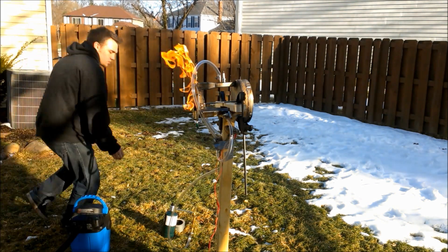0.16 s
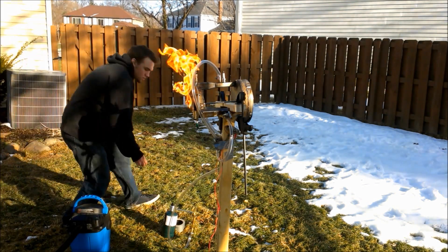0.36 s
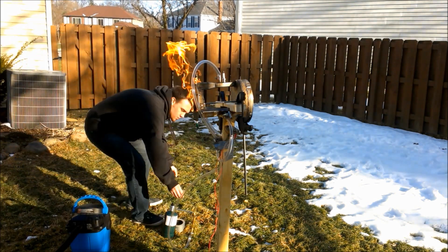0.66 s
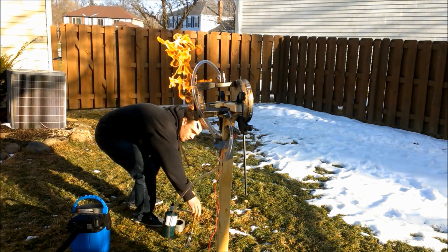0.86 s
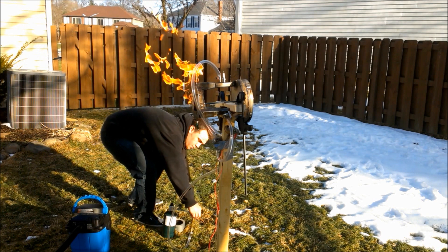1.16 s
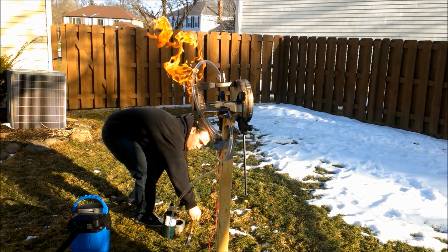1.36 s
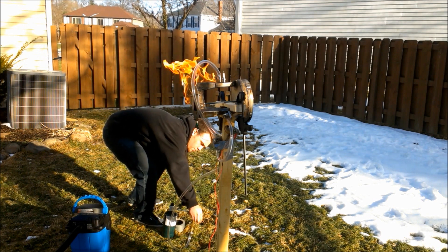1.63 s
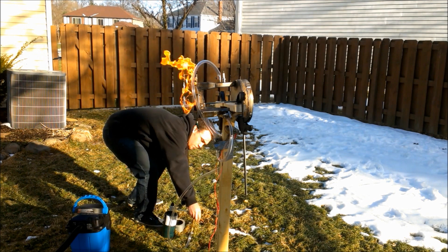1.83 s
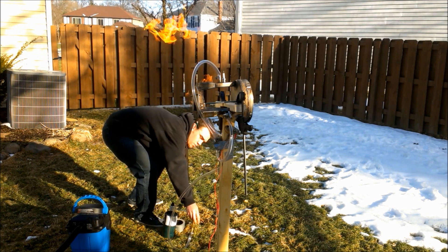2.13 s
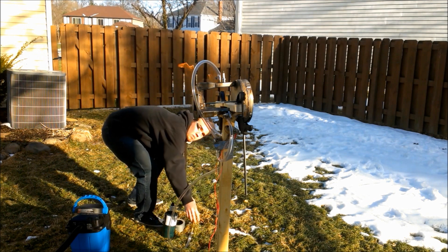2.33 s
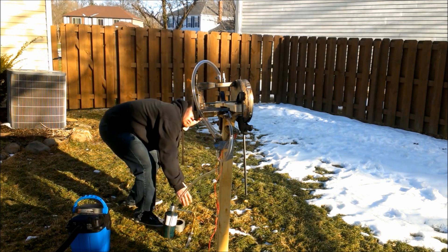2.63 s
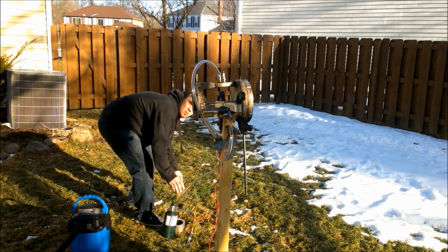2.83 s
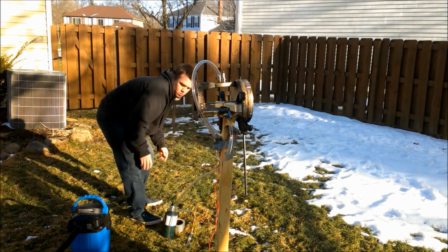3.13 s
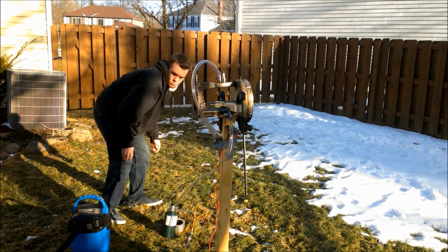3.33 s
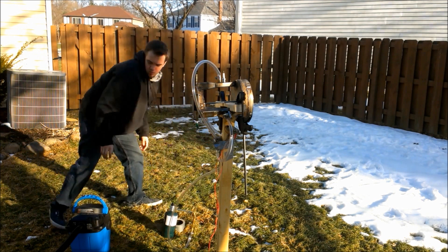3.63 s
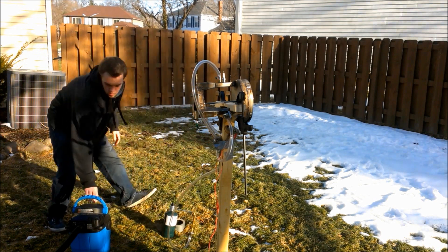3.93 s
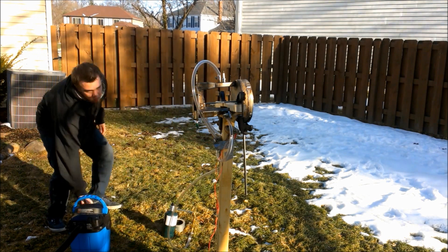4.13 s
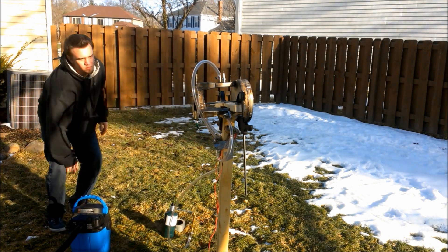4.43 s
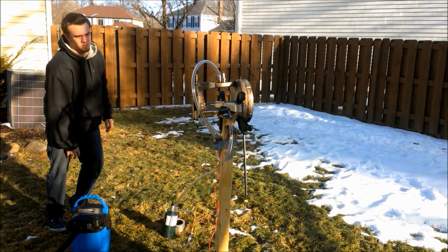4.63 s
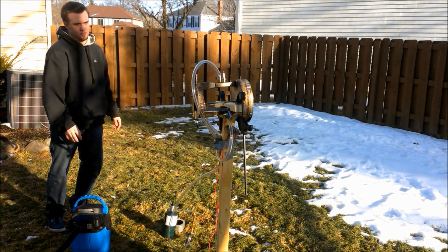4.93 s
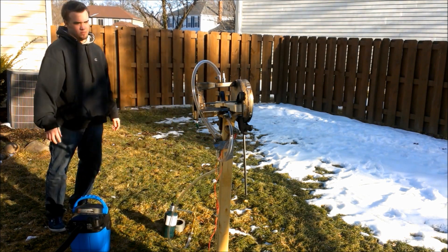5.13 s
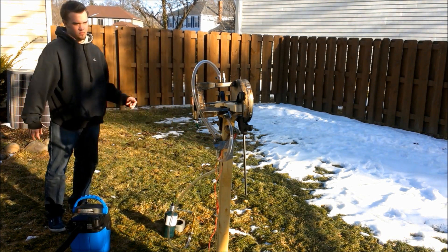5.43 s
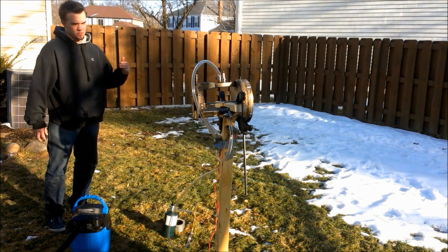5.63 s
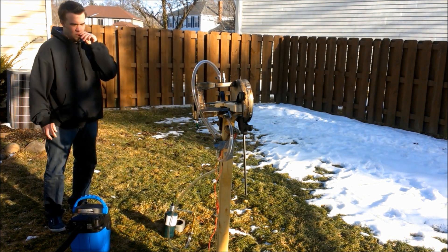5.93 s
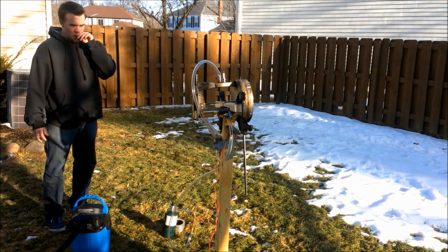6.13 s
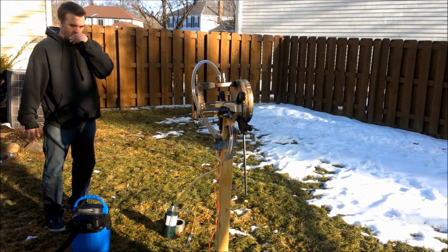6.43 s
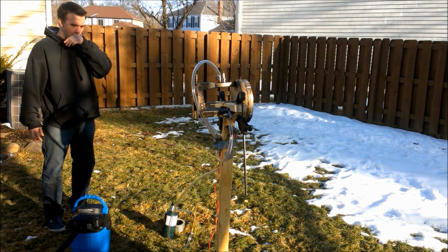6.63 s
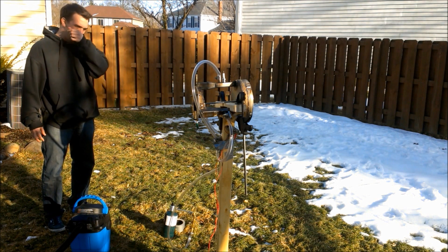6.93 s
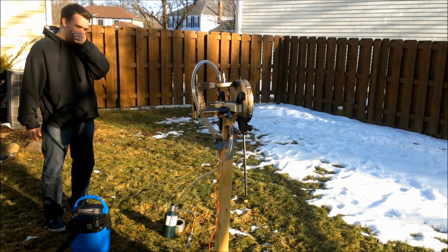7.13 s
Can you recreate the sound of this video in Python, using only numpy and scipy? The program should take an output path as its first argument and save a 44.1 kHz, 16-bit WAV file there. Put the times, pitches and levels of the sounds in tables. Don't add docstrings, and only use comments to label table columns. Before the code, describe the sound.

Outdoors in a fenced yard, a small electric blower runs steadily from 0 to 4 seconds: a shaft hum around 530 Hz, a piercing blade whine near 6.4 kHz and many thin overtones inside a dense bright hiss, the treble leaning left. Beneath it a burner rumbles in lumpy low flutters, with gusts and lulls. A soft double knock lands at about 1.85 and the loudest low knock at 2.84; the hiss dips slightly afterward. At 4.0 a switch makes a sharp tick with a short rustle. The air rush fades fast over the next second or so while all the tones slide continuously downward, swelling and dipping through resonances. A faint step comes at 5.1, a scuff and dull puff at 5.8. By 6 the rumble is nearly gone; the sinking whine thins toward 7.3, with a soft puff at 6.6, a low step at 7.1, and faint distant wash.

```python
import sys
import numpy as np
from scipy import signal
from scipy.io import wavfile
from scipy.ndimage import uniform_filter1d

SR = 44100
rng = np.random.default_rng(int(sys.argv[2]) if len(sys.argv) > 2 else 0)


def volts_from_decibels(level):
    exponent = np.asarray(level, float) / 20
    return 10 ** exponent


def generate_wav(signal):
    frames = np.transpose(np.atleast_2d(signal))
    scaled = np.clip(frames, -1, 1) * 32767
    pcm = np.round(scaled).astype(np.int16)
    wavfile.write(sys.argv[1], SR, pcm)


N = 320607
HOP, WINDOW = 256, 1024
FRAMES = N // HOP + 5
HZ, T = np.fft.rfftfreq(WINDOW, 1 / SR), np.arange(FRAMES) * HOP / SR

RUN_HZ, OFF_S, BLADES, MAINS_HZ = 532.3, 4.006, 12, 119.6
DRAG_HZ, DRAG_PER_S = 193.4, .2374
TONE_ORDERS = [4, 3.38, 7, 8, 9, 10, 13, 15, 16, 17, 18, 19, 22, 24, 27, 29, 36, 31, 34, 41, 44, 48]
TONES_DB = [-47, -44, -58, -62, -61, -61, -55, -61, -63, -63, -64, -63, -62, -45, -60, -61, -56, -61, -61,
            -56, -61, -63]
FAINT_ORDERS = [35, 14, 20, 21, 23, 25, 26, 28, 30, 32, 33, 37, 38, 39, 40, 42, 43, 45]
FAINT_DB = -62
# (frequency [Hz], width [Hz], lift [dB])
FLARES = [(2850, 300, 17), (4200, 400, 3), (5700, 330, 14), (7300, 1500, 2)]
RATTLE_DB, RATTLE_OCT = 7, 1.2

# (time [s], shaft level [dB], 2nd order level [dB], 3rd order level [dB])
PATH = [(0.1, -44, -66.5, -59.5), (0.58, -55, -55.5, -53.5), (1.1, -49.5, -55.5, -58.5),
        (2.44, -51, -57.5, -60.5), (2.8, -48, -61, -67), (3.2, -47.5, -62.5, -62), (3.6, -52, -68.5, -59),
        (4.0, -53, -63, -60)]
# (frequency [Hz], width [Hz], lift [dB])
STAND_MODES = [(445, 62, 11.5), (425, 3.1, -16), (409, 10, 7), (394.6, 17, -10), (320, 94, 10),
               (276.3, 29.5, 9.5), (244.8, 37, 13.5), (215.5, 5.8, -14.5), (201, 20, 5), (182.2, 7.3, -11),
               (170, 7.4, 9)]
COAST_SHAFT_DB, STAND_KNEE_HZ, STAND_DB_PER_OCT = -55, 184.4, 98
# (frequency [Hz], width [Hz], lift [dB])
HOSE_MODES = [(1500, 140, 25), (970, 190, 19), (800, 70, -8), (725, 60, 10), (590, 80, 12), (466, 25, 9),
              (405, 30, 12)]
COAST_LOW_DB = [-74, -80]
LOW_DB_PER_OCT = 5
BEARING_ORDER, BEARING_DB, BEARING_COAST_DB = 4.38, -77, -93
# (frequency [Hz], width [Hz], lift [dB])
BEARING_MODES = [(740, 330, 20)]

BLADE_DB, BLADE_SAG_DB_PER_S, BLADE_COAST_DB, BLADE_DB_PER_OCT = -54, 1, -55, 28
# (time [s], length [s], lift [dB])
EDDIES = [(.16, 0.074, 9), (.36, 0.13, 9.5), (.5, 0.083, 9), (.58, 0.054, 12), (.66, 0.046, 10.5),
          (.85, 0.34, 11), (1.22, .06, 9), (1.76, 0.37, 14), (2.52, 0.12, 11), (2.75, 0.2, 12),
          (3.1, 0.12, 7.5), (3.39, .09, -12), (3.49, 0.11, 7.5)]
# (frequency [Hz], width [Hz], lift [dB])
BLADE_MODES = [(5570, 170, 17), (4750, 500, 7), (3500, 700, -6), (2860, 200, 16), (2330, 150, 20)]

# (time [s], level [dB])
AIR = [(0, -47), (.5, -47.5), (1.1, -47), (1.4, -47.5), (1.86, -47), (2.05, -48), (2.79, -48),
       (2.95, -50.5), (3.75, -51), (3.97, -52), (4.01, -51), (4.11, -52), (4.35, -57.5), (4.64, -62),
       (5.04, -67.5), (5.5, -72), (6.48, -87), (7.27, -96)]
# (frequency [Hz], density [dB per Hz])
HISS_COLOUR = [(1500, -67), (2100, -20), (2900, -12.5), (3700, -6.5), (5100, -6), (6300, -4.5),
               (7400, -9.5), (9000, -17.5), (10000, -24), (12000, -24), (15700, -36)]
# (frequency [Hz], density [dB per Hz])
BODY_COLOUR = [(90, -75), (200, -13.5), (400, -4), (700, -5), (1000, -0.5), (1200, -7.5), (1500, -7.5),
               (2000, -19.5), (3000, -26)]
# (frequency [Hz], density [dB per Hz])
COAST_COLOUR = [(1300, -32), (2000, -2.5), (2900, 3), (3500, 6), (4500, -32)]
# (frequency [Hz], width [Hz], lift [dB])
CASING_MODES = [(2940, 260, 3.5), (3978, 127, 10), (4510, 970, 7), (5583, 520, 9), (6930, 480, 4),
                (8450, 190, 7), (11200, 250, 0.5), (11400, 170, -5), (14600, 260, 2), (15150, 600, 7.5),
                (12200, 360, -10), (1400, 150, 4), (13000, 200, 8)]
# (time [s], length [s], frequency [Hz], level [dB])
THROWN = [(0.55, 1.8, 1420, -62.5), (3.45, 1.04, 646, -61), (0.058, 0.42, 1046, -56.5),
          (3.9, 0.46, 1000, -61), (4.03, 0.13, 3230, -58)]
FULL_DB = -47.5
TOP_DB, TOP_SLOPE, TOP_LEAST_DB = -2.5, 1.76, -10
BODY_DB, BODY_SLOPE = -57, 0.6

# (frequency [Hz], correlation [-1..1])
LIKENESS = [(60, 0.48), (120, 0.049), (240, 0.48), (480, 0.9), (950, 0.72), (1890, -0.034), (3770, 0.47),
            (7520, 0.54), (15000, 0.57)]
# (frequency [Hz], left over right [dB])
LEAN = [(60, -1), (92, 10), (140, -2), (210, 0), (330, -0.5), (500, -0.5), (770, 0), (1170, 1), (1790, -5),
        (2740, 3), (4190, 4.5), (6410, 13.5), (9810, 7.5), (15000, 15.5)]
# (frequency [Hz], left ahead of right [rad])
LEAD = [(0, 0), (300, .15), (700, .45), (1100, 1.3), (1640, 2.6), (2760, 6.3), (16000, 6.3)]
SHADE_S, SHADE_LEAN_DB = 2.82, -1
# (time [s], length [s], lift [dB])
DIPS = [
    (4.5, 0.31, -4),
    (5.63, 0.095, -9),
]

# (time [s], level [dB])
RUMBLE = [(0, -53.5), (1, -58), (2, -55), (3.2, -53), (3.6, -48.5), (4, -50.5), (4.33, -51.5), (4.6, -56.5),
          (4.9, -54), (5.5, -57.5), (5.8, -58.5), (6, -72), (6.5, -88), (6.75, -66), (6.95, -82),
          (7.27, -79)]
# (frequency [Hz], density [dB per Hz])
RUMBLE_COLOUR = [(40, -15), (90, -44), (130, -7.5), (180, 0), (250, 0), (310, -5.5), (450, -13.5),
                 (700, -37)]
# (frequency [Hz], density [dB per Hz])
GUST_COLOUR = [(40, -36), (80, -36), (125, 6), (165, 22), (210, -4), (300, -32)]
# (time [s], length [s], lift [dB])
PUFFS = [(.18, 0.079, -9), (.73, 0.065, 2), (.93, .07, 3), (1.19, 0.39, 7), (1.29, 0.035, -20),
         (1.5, 0.077, 6.5), (1.6, 0.044, -3), (1.86, 0.3, 5), (1.99, .03, -16), (2.05, 0.064, 10),
         (2.25, 0.13, 7.5), (2.43, 0.19, 7), (2.63, 0.048, 4), (2.69, 0.054, -6), (2.84, 0.032, 15),
         (3.02, 0.084, 7.5), (4.02, 0.048, 4.5)]

KNOCKS_S = [1.852, 1.876, 2.838, 5.07, 5.805, 5.822, 6.605, 7.068]
# (peak [dB], frequency [Hz], t60 [s], noise share [0..1], left over right [dB])
KNOCKS = [
    (-29.5, 340, 0.14, 0.83, 0.5),
    (-24, 240, 0.038, 0.4, 1.5),
    (-18, 340, 0.037, 0.56, 2),
    (-49, 690, 0.26, 0.6, -4),
    (-58, 3200, 0.41, 0.77, 11),
    (-38, 200, 0.085, 0.85, 3),
    (-55, 430, 0.22, 0.95, -1),
    (-44, 147, 0.095, 0.48, 13),
]
CLICK_S, CLICK_DB, RUSTLE_DB = 4.002, -34, -51

# (frequency [Hz], density [dB per Hz])
YARD_COLOUR = [(50, -22), (150, 1.5), (250, -12), (600, -5.5), (1000, -10), (1400, -18.5), (3000, -21.5),
               (5600, -19), (8000, -24), (15700, -26)]
YARD_DB = -67.5


def blower():
    t, shaft_hz = np.arange(N) / SR, speed()
    angle = 2 * np.pi * np.cumsum(shaft_hz) / SR
    hz = np.interp(T, t, shaft_hz)
    ripple = np.cos(2 * np.pi * MAINS_HZ * t) * (t < OFF_S)
    hiss_db = curve(AIR, T) + 0.48 * drift(T, 14)
    fall_db = curve(AIR, T) - FULL_DB
    top_db = np.maximum(TOP_DB + TOP_SLOPE * fall_db, TOP_LEAST_DB) + 0.3 * drift(T, 14)
    body_db = BODY_DB + BODY_SLOPE * fall_db + 0.47 * drift(T, 16)
    out = main_tones(angle, hz, ripple) + order_tones(angle, hz, hiss_db, top_db)
    throb = .03 * ripple + .08 * np.cos(angle)
    return out + air_stream(hz, hiss_db, top_db, body_db) * (1 + throb)


def speed():
    coasting_s = np.maximum(np.arange(N) / SR - OFF_S, 0)
    return DRAG_HZ * np.tan(np.arctan(RUN_HZ / DRAG_HZ) - DRAG_PER_S * coasting_s)


def main_tones(angle, hz, ripple):
    on, octaves = T < OFF_S, np.log2(RUN_HZ / hz)
    powered_db = BLADE_DB - BLADE_SAG_DB_PER_S * T + swells(EDDIES, T)
    coast_db = BLADE_COAST_DB - BLADE_DB_PER_OCT * octaves + modes_db(BLADES * hz, BLADE_MODES)
    blade_db = np.where(on, powered_db, coast_db) + 0.61 * drift(T, 15)
    out = tone(BLADES, blade_db, angle, hz) * (1 + 0.18 * ripple)
    powered_db = curve(PATH, T) + 0.39 * drift(T, 8)
    below_knee_oct = np.maximum(np.log2(STAND_KNEE_HZ / hz), 0)
    coast_db = COAST_SHAFT_DB + modes_db(hz, STAND_MODES) - STAND_DB_PER_OCT * below_knee_oct
    out += tone(1, np.where(on, powered_db, coast_db), angle, hz)
    for k, db in zip((2, 3), COAST_LOW_DB):
        coast_db = db - LOW_DB_PER_OCT * octaves + modes_db(k * hz, HOSE_MODES)
        level_db = np.where(on, curve(PATH, T, order=k), coast_db) + 1.8 * glints()
        out += tone(k, level_db, angle, hz)
    coast_db = BEARING_COAST_DB + modes_db(BEARING_ORDER * hz, BEARING_MODES)
    level_db = np.where(on, BEARING_DB, coast_db) + 1.8 * glints()
    return out + tone(BEARING_ORDER, level_db, angle, hz)


def order_tones(angle, hz, hiss_db, top_db):
    out = np.zeros((2, N))
    rattle_db = RATTLE_DB * np.minimum(np.log2(RUN_HZ / hz) / RATTLE_OCT, 1)
    levels_db = TONES_DB + [FAINT_DB] * len(FAINT_ORDERS)
    for k, db in zip(TONE_ORDERS + FAINT_ORDERS, levels_db):
        second_blade = k == 2 * BLADES
        colour_db = read(HISS_COLOUR, k * hz) + modes_db(k * hz, FLARES)
        treble = np.clip(k * hz / 2000 - 3, 0, 1) * ((T < OFF_S) | second_blade)
        stream_db = hiss_db + 47 + (top_db + 4) * treble
        stream_db += rattle_db * (not second_blade)
        stream_db -= 14 * (T > OFF_S) * (k == BLADES + 1)
        waver_db = np.where(T < OFF_S, 2.5 * drift(T, 9), 3.3 * glints() - 1)
        start_s = OFF_S * (k > 2 * BLADES)
        out += tone(k, db + colour_db + stream_db + waver_db, angle, hz, start_s)
    return out


def air_stream(hz, hiss_db, top_db, body_db):
    colour_db = read(HISS_COLOUR, HZ) + modes_db(HZ, CASING_MODES)
    above_8k_oct = np.log2(HZ / 8000 + 1e-3)
    hiss_colour_db = colour_db - 15 * np.maximum(above_8k_oct + 0.33, 0)
    fizz_colour_db = colour_db + 25 * np.minimum(above_8k_oct - .2, 0)
    coast_db = hiss_db - 20.0 + 18 * np.minimum(4.3 * np.log2(RUN_HZ / hz), 1)
    layers = [(hiss_colour_db, hiss_db + 6.5),
              (fizz_colour_db, hiss_db + top_db + 6.5),
              (read(BODY_COLOUR, HZ), body_db + 6.0),
              (read(COAST_COLOUR, HZ), coast_db)]
    for s, length_s, f, db in THROWN:
        level_db = db - 36.5 + swells([(s, 2.1 * length_s, 40)], T)
        layers.append((modes_db(HZ, [(f, .25 * f, 40)]), level_db))
    return noise(layers, 1.59, read(LIKENESS, HZ))


def tone(multiple, level_db, angle, hz, start_s=0.):
    first, f, out = round(start_s * SR), multiple * hz, np.zeros((2, N))
    t = np.arange(first, N) / SR
    left, right = ports(f, T) * (np.sqrt(2) * volts_from_decibels(level_db) * (f < 15700))
    turn = multiple * angle[first:] + 2 * np.pi * rng.random()
    lead = np.interp(t, T, read(LEAD, f))
    out[0, first:] = np.interp(t, T, left) * np.sin(turn)
    out[1, first:] = np.interp(t, T, right) * np.sin(turn - lead)
    return out


def ports(hz, t):
    shade_db = SHADE_LEAN_DB * (t > SHADE_S) * np.clip(hz / 3500, 0, 1) ** 2
    right = volts_from_decibels(-(read(LEAN, hz) + shade_db))
    return 2 / (1 + right), 2 * right / (1 + right)


def rumble():
    lumps = evened(uniform_filter1d(rng.standard_normal(FRAMES), 3))
    level_db = curve(RUMBLE, T) + swells(PUFFS, T) - 1.5 + 2.14 * lumps
    gust_db = uniform_filter1d(level_db, 40)
    layers = [(read(RUMBLE_COLOUR, HZ), level_db),
              (read(GUST_COLOUR, HZ), level_db + 5.0 + 4.2 * (gust_db + 49.5))]
    return noise(layers, 0.37, np.full_like(HZ, .97), from_blower=False)


def knocks():
    out, t = np.zeros((2, N)), np.arange(6000) / SR
    for s, (db, hz, t60_s, share, pan_db) in zip(KNOCKS_S, KNOCKS):
        band = signal.butter(2, [.5 * hz, 2 * hz], "band", fs=SR)
        puff = evened(signal.lfilter(*band, rng.standard_normal(len(t))))
        share = np.clip(share, 0, 1)
        push = (1 - share) * np.sin(2 * np.pi * hz * t) + share * puff / 2
        shape = volts_from_decibels(db - 60 * t / t60_s) * (1 - np.exp(-t / 0.0031))
        add(out, s, push * shape * volts_from_decibels([[pan_db / 2], [-pan_db / 2]]))
    return out


def switch():
    out, t = np.zeros((2, N)), np.arange(6000) / SR
    band = signal.butter(1, [2800, 14000], "band", fs=SR)
    bright = signal.lfilter(*band, rng.standard_normal((2, len(t))))
    shape = volts_from_decibels(CLICK_DB - 60 * t / .022) + volts_from_decibels(RUSTLE_DB - 60 * t / 0.88)
    add(out, CLICK_S, bright * shape * volts_from_decibels([[2.5], [-2.5]]))
    return out


def yard():
    likeness = 0.91 / (1 + (HZ / 1500) ** 2) + 0.026
    layers = [(read(YARD_COLOUR, HZ), YARD_DB + drift(T, 4.9))]
    return noise(layers, 0.95, likeness, from_blower=False)


def noise(layers, patchy_db, likeness, from_blower=True):
    a, b, c, d, patches = rng.standard_normal((FRAMES, len(HZ), 5)).T
    patches = evened(uniform_filter1d(uniform_filter1d(patches, 10, 0), 12, 1))
    power = 0
    for spectrum_db, level_db in layers:
        density = volts_from_decibels(2 * spectrum_db)
        power = power + density[:, None] / density.sum() * volts_from_decibels(2 * level_db)
    same = np.clip(likeness, -1, 1)[:, None]
    left = a + 1j * b
    right = same * left + np.sqrt(1 - same ** 2) * (c + 1j * d)
    z = np.array([left, right])
    if from_blower:
        lag = np.exp([[[0]], [[-1j]]] * read(LEAD, HZ)[:, None])
        z = z * ports(HZ[:, None], T) * lag
    z = z * np.sqrt(power) * volts_from_decibels(patchy_db * patches)
    return signal.istft(z, nperseg=WINDOW, noverlap=WINDOW - HOP)[1][:, :N]


def modes_db(hz, modes):
    return sum(db / (1 + (2 * (hz - f) / width) ** 2) for f, width, db in modes)


def swells(rows, t):
    return sum(db * np.exp(-(2 * (t - s) / length_s) ** 2) for s, length_s, db in rows)


def drift(t, top_hz):
    f = np.geomspace(.2, top_hz, 16)[:, None]
    waves = np.sin(2 * np.pi * (f * t + rng.random(f.shape)))
    return evened((waves / np.sqrt(f)).sum(0))


def glints(size=16):
    return evened(uniform_filter1d(uniform_filter1d(rng.standard_normal(FRAMES), size), size))


def evened(x):
    return x / np.sqrt(np.mean(x ** 2) + 1e-20)


def read(points, hz):
    f, value = np.transpose(points)
    return np.interp(np.log(hz + 1), np.log(f + 1), value)


def curve(rows, t, order=1):
    rows = np.array(rows)
    return np.interp(t, rows[:, 0], rows[:, order])


def add(mix, s, sound):
    part = mix[:, round(s * SR):][:, :sound.shape[1]]
    part += sound[:, :part.shape[1]]


def scene():
    dip = volts_from_decibels(swells(DIPS, np.arange(N) / SR))
    return (blower() + rumble()) * dip + knocks() + switch() + yard()


def starve(x):
    hz, _, z = signal.stft(x, SR, nperseg=WINDOW, noverlap=WINDOW - HOP)
    power = uniform_filter1d((abs(z) ** 2).sum(0), 8, 1) + 1e-20
    under_db = 10 * np.log10(power.sum(0) / power[hz > 10000].sum(0))
    luck = rng.standard_normal((len(hz) // 5 + 1, z.shape[2] // 8 + 1))
    luck = luck.repeat(5, 0).repeat(8, 1)[:len(hz), :z.shape[2]]
    bar = 1.3 - .062 * (under_db - 17) + np.maximum(11 - hz / 1000, 0)[:, None] * .5
    return signal.istft(z * (luck < bar), SR, nperseg=WINDOW, noverlap=WINDOW - HOP)[1][:, :N]


def top_cut(x):
    return signal.sosfilt(signal.butter(12, 16660, fs=SR, output="sos"), x)


def record(dry):
    mix = signal.lfilter(*signal.butter(2, 70, "high", fs=SR), dry)
    band_limit = signal.firwin(1023, 15740, window=("kaiser", 10), fs=SR)
    mix = signal.oaconvolve(mix, band_limit[None], "same")
    mix = starve(mix)
    return top_cut(mix)


dry = scene()
out = record(dry)
generate_wav(out)
```